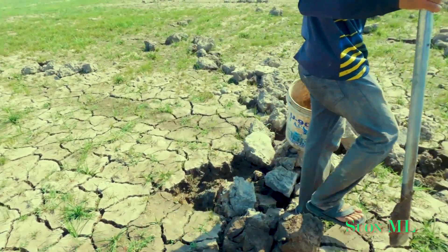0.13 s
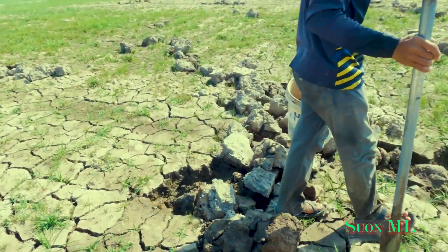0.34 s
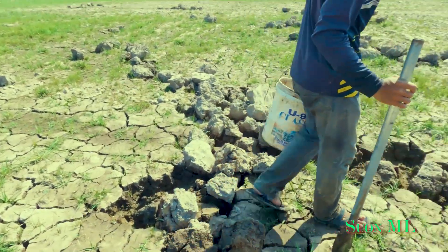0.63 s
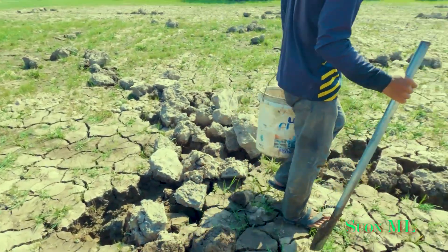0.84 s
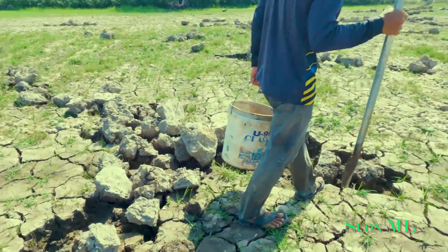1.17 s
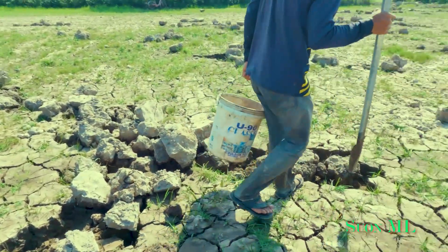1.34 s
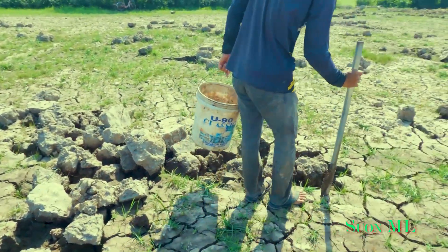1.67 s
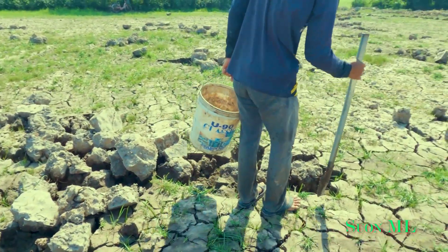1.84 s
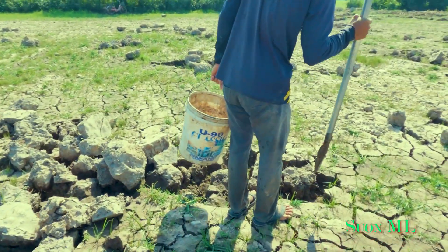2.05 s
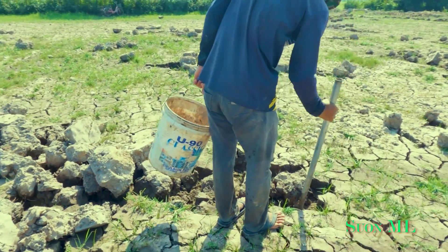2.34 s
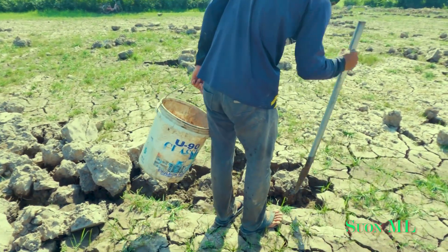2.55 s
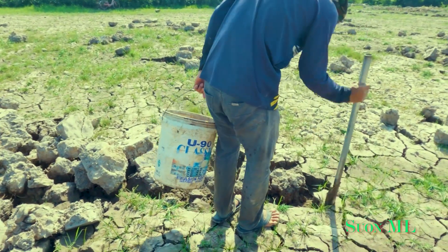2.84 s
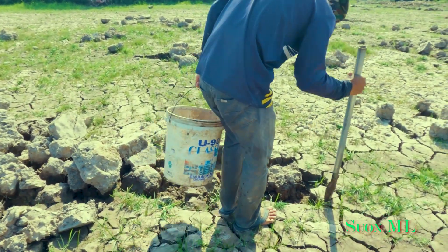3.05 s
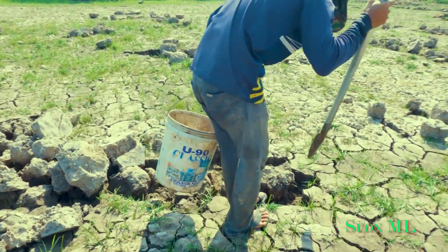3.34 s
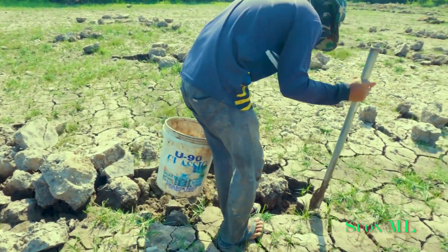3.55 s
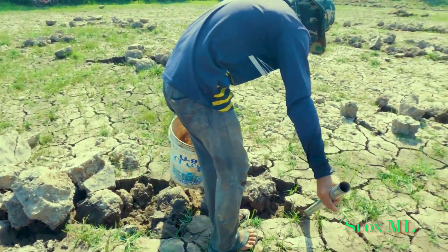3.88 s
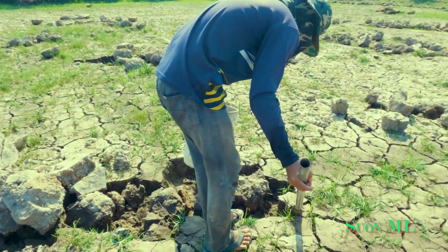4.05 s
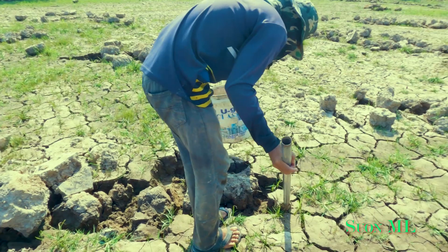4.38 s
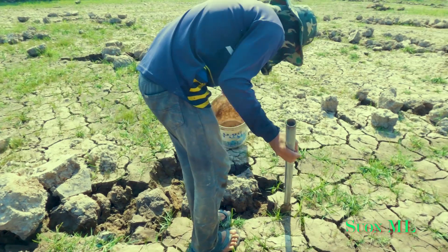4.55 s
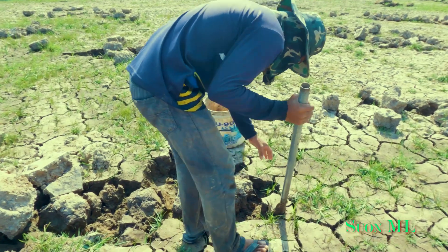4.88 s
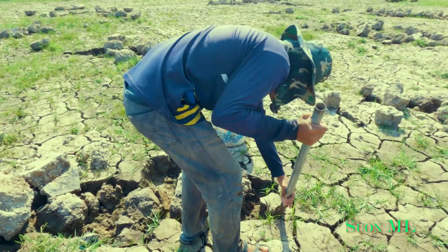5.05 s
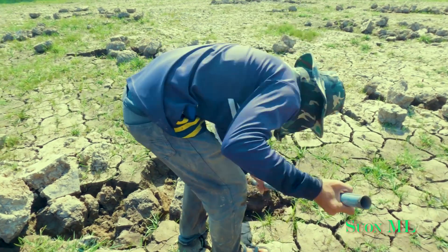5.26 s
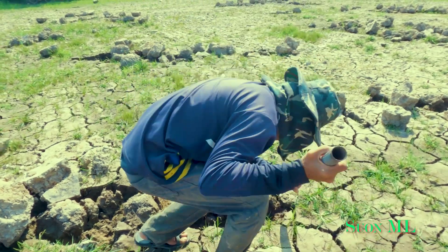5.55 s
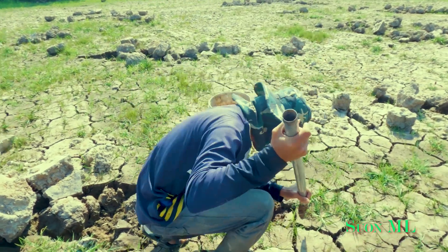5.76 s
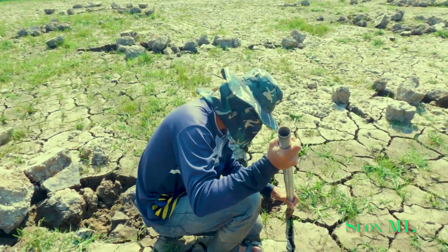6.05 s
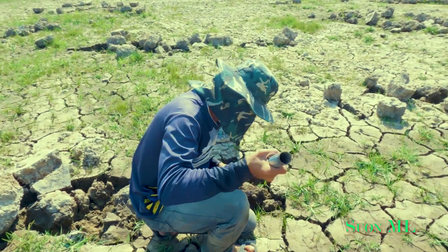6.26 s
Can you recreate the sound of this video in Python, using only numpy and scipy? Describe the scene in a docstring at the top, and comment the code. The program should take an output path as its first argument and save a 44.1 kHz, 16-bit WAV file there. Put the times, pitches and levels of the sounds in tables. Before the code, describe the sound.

A steel pipe stabs and crunches into dry clay, then a plastic bucket bumps down, over rustling and low wind rumble.

```python
"""An open field of dry cracked clay, a stereo microphone close to a man with a steel pipe and a bucket.
From the start gusts rumble on the microphone ports, feet and clothes rustle and crumbs snap.
From half a second in he stabs the pipe into the crust and pries: a crunch, a thud, a short ring.
Near 4.7 s the plastic bucket is set down with a hollow bump and its handle falls on the rim.
Two faint touches of the pipe follow after 6 s."""
import sys
import numpy as np
from scipy import signal
from scipy.io import wavfile

SR = 44100
rng = np.random.default_rng(int(sys.argv[2]) if len(sys.argv) > 2 else 0)


def materialize(psi):
    """Save the field psi as 16-bit PCM at rate SR to the path in sys.argv[1].

    A 1-D psi becomes a single channel; in a 2-D psi each row is a channel.
    """
    bounded = np.clip(np.atleast_2d(psi).T, -1, 1)
    quanta = np.round(bounded * 32767).astype(np.int16)
    wavfile.write(sys.argv[1], SR, quanta)


N = 283122
SCUFF_HZ, GRIT_HZ, CLOTH_HZ, TOP_HZ = 330, 1100, 5500, 16500   # edges of three noise regions


def from_db(db):
    """dB to gain."""
    return 10 ** (np.asarray(db) / 20)


def rms_one(x):
    """Scale to rms 1."""
    return x / np.sqrt(np.mean(x ** 2) + 1e-20)


def in_time(rows):
    """Each column of a timed table as a curve over every sample."""
    s, *columns = np.transpose(rows)
    return [np.interp(np.arange(N) / SR, s, c) for c in columns]


def at_hz(points, hz):
    """Read a table on a log-frequency axis."""
    frequencies, values = np.transpose(points)
    return np.interp(np.log(hz), np.log(frequencies), values)


def drift(rate_hz):
    """Slow random wander: low-passed noise at every 40th sample, rms 1."""
    r = np.exp(-80 * np.pi * rate_hz / SR)
    slow = signal.lfilter([1], [1, -2 * r, r * r], rng.standard_normal(N // 40 + 2002))[2000:]
    return np.interp(np.arange(N) / 40, np.arange(len(slow)), rms_one(slow))


def pan(db):
    """Left and right gains for a level difference."""
    return from_db([[db / 2], [-db / 2]])


def add(out, s, sound):
    """Mix a short sound in at s seconds."""
    i = round(s * SR)
    out[..., i:i + sound.shape[-1]] += sound[..., :N - i]


# How alike the two ports hear. Each row: frequency in Hz, likeness (1 is identical).
PORT_LIKENESS = [(25, 0.76), (60, 0.99), (150, 1), (380, 0.28), (950, 0.53), (2380, 0.84), (5980, 0.81),
                 (15000, 0.94)]

def bands(source, spectrum, low_hz, high_hz, patchy_db=0., patch_hz=10., shared_db=0.):
    """Mid and side noise to stereo in third-octave bands, each with its level, flicker and likeness."""
    out = 0
    edges = np.geomspace(low_hz, high_hz, round(3 * np.log2(high_hz / low_hz)) + 1)
    for k, (low, high) in enumerate(zip(edges, edges[1:])):
        band = signal.butter(2, [low, high], "band", fs=SR, output="sos")
        mid, side = signal.sosfilt(band, source[k % 2])
        hz = np.sqrt(low * high)
        alike = np.clip(at_hz(PORT_LIKENESS, hz), -1, 1)
        flicker_db = patchy_db * drift(patch_hz) + shared_db if patchy_db else 0
        gain = from_db(at_hz(spectrum, hz) + flicker_db)
        out = out + gain * (np.sqrt(1 + alike) * mid + np.sqrt(1 - alike) * side * [[1], [-1]])
    return out


# Wind right on the ports. Each row: time in seconds, deep gust in dB, upper rumble in dB,
# deep gust's left minus right in dB.
GUSTS = [(0.0, -41.5, -54, 7), (0.36, -48.5, -53.5, 3), (0.71, -45.5, -51, -3.5), (1.14, -46.5, -55.5, 0),
         (1.63, -54.5, -50.5, 2.5), (2.0, -36.5, -57, -7), (2.34, -52.5, -53.5, 11),
         (2.36, -47.5, -52.5, -10), (2.65, -49.5, -55, 0), (3.22, -53.5, -56, 3.5), (3.56, -51.5, -54.5, 0),
         (4.02, -57, -55.5, 0.5), (4.67, -50, -52, 0.0), (4.83, -52, -50.5, 2), (4.94, -50.5, -44, 1),
         (5.38, -49, -51.5, 1), (5.78, -50.5, -55.5, 0.5), (6.42, -58.5, -54, -3)]
# Colour of the rumble. Each row: frequency in Hz, relative level in dB.
GUST_SPECTRUM = [(11, -42), (18, -24.5), (38, -4.5), (65, -2), (156, -16), (188, -17), (238, -21),
                 (309, -36), (350, -34), (460, -64), (770, -120)]

def wind():
    """Lumpy low noise from eddies on the ports; an eddy lifts all bands together."""
    deep_db, upper_db, pan_db = in_time(GUSTS)
    white, eddies = rng.standard_normal((2, 2, N)), drift(32)
    deep = bands(white, GUST_SPECTRUM, 14, 107.1, patchy_db=5.5, patch_hz=2.6, shared_db=0.85 * eddies)
    upper = bands(white[::-1], GUST_SPECTRUM, 104.6, 324, patchy_db=2, patch_hz=4.7, shared_db=3 * eddies)
    sway = from_db([pan_db / 2, -pan_db / 2])
    return from_db(deep_db) * rms_one(deep) * sway + from_db(upper_db) * rms_one(upper)


def grainy(per_s, spread_db, grain_db):
    """Two mid and side pairs of smooth noise, with uneven grains breaking through in clumps."""
    born = rng.random((2, 1, N)) < per_s * from_db(6 * drift(15)) / SR
    sizes = from_db(spread_db * np.minimum(rng.exponential(1, N), 3))
    white = rng.standard_normal((2, 2, N))
    return white * (1 + from_db(grain_db) * born * sizes)


# The man moving over the clay. Each row: time in seconds, grit level in dB.
MOVEMENT = [(0.0, -64.5), (0.37, -68.5), (0.62, -60.5), (1.16, -60), (1.7, -54.5), (1.88, -61.5),
            (2.07, -66.5), (2.4, -64.5), (2.65, -59.5), (3.06, -55.5), (3.16, -61), (3.45, -65.5),
            (3.7, -62.5), (3.9, -60), (4.15, -57), (4.29, -63.5), (4.52, -64), (4.86, -59), (5.7, -63),
            (5.97, -64), (6.42, -54.5)]
# Colour of the rubbing. Each row: frequency in Hz, relative level in dB.
RUB_SPECTRUM = [(180, -32), (300, 7), (398, 2), (772, -3.5), (974, -6.5), (1060, -9.5), (1310, -3.5),
                (2090, -4), (2720, -5.5), (3670, -6.5), (6040, -13), (9140, -14), (14500, -30.5),
                (15800, -10)]

def rustle():
    """Feet, pipe and clothes rub: low scuff, grit and high cloth noise, all in short lumps."""
    grit_db, = in_time(MOVEMENT)
    swing_db = grit_db - grit_db.mean()
    scuff_db, cloth_db = -69.5 + 0.68 * swing_db, -70 + 0.88 * swing_db
    grains, lumps = grainy(per_s=500, spread_db=5, grain_db=5), drift(44)
    scuff = bands(grains, RUB_SPECTRUM, SCUFF_HZ, GRIT_HZ,
                  patchy_db=0.5, patch_hz=12, shared_db=3.6 * lumps)
    grit = bands(grains[::-1], RUB_SPECTRUM, GRIT_HZ, CLOTH_HZ,
                 patchy_db=3, patch_hz=12, shared_db=0.78 * lumps)
    cloth = bands(grains[..., ::-1], RUB_SPECTRUM, CLOTH_HZ, TOP_HZ,
                  patchy_db=0.04, patch_hz=14, shared_db=0.83 * lumps)
    air = signal.sosfilt(signal.butter(4, 10500, "high", fs=SR, output="sos"), cloth)
    cloth = cloth + 0.36 * np.tanh(swing_db / 10) * air   # the top comes and goes with the movement
    grit_rise_db, cloth_rise_db = swishes()
    return (from_db(scuff_db + .6 * grit_rise_db) * rms_one(scuff)
            + from_db(grit_db + grit_rise_db) * rms_one(grit)
            + from_db(cloth_db + cloth_rise_db) * rms_one(cloth))


def faint_crumbs(count, over_grit_db=7, middle_hz=2370):
    """Rows for small crumbs that snap at random moments, louder where there is more movement."""
    when, chance = rng.random(count) * N / SR, rng.standard_normal((count, 2))
    s, grit_db = np.transpose(MOVEMENT)
    level_db = over_grit_db + np.interp(when, s, grit_db) + 2.5 * chance[:, 0]
    return list(zip(when, level_db, middle_hz * np.exp(.6 * chance[:, 1])))


# The loudest crumbs of clay. Each row: start in seconds, level in dB, pitch in Hz.
LOUD_CRUMBS = [(0.361, -45.5, 2240), (0.481, -42, 7600), (0.584, -46, 2370), (0.783, -40, 1520),
               (0.811, -37, 3000), (0.843, -38, 1450), (1.204, -44.5, 1490), (1.254, -39.5, 2170),
               (1.687, -40, 2200), (1.713, -31, 4500), (2.494, -34.5, 1870), (2.509, -38.5, 1520),
               (3.034, -41, 2280), (3.365, -42, 1320), (3.536, -41.5, 1700), (3.794, -45.5, 3770),
               (4.147, -37.5, 2430), (4.289, -40.5, 1780), (4.33, -37.5, 2470), (4.449, -45, 1330),
               (4.494, -38.5, 1460), (4.636, -44.5, 990), (5.157, -38.5, 1210), (5.269, -45, 1570),
               (5.37, -46, 3700), (5.412, -42, 2150), (5.55, -42, 895), (5.575, -35.5, 1470),
               (5.713, -45.5, 2200), (5.788, -48, 1980), (6.101, -42, 1640), (6.274, -40, 3750),
               (6.344, -46.5, 2650)]

def snaps(ring_cycles=12.5, clicks_per_s=5000, spray_t60=0.031, scatter_db=3):
    """A crumb breaks with a click, rings a few cycles and crumbles in a spray of tiny uneven clicks."""
    out, t = np.zeros((2, N)), np.arange(SR // 12) / SR
    for s, level_db, hz in LOUD_CRUMBS + faint_crumbs(count=70):
        tone = np.sin(2 * np.pi * hz * t) * from_db(-0.5 - 60 * t * hz / ring_cycles)
        band = signal.butter(3, [hz / 2, min(2 * hz, TOP_HZ)], "band", fs=SR, output="sos")
        clicks = rng.standard_normal(len(t)) * (rng.random(len(t)) < clicks_per_s / SR)
        clicks[0] = 2.5   # the first break is the sharpest
        spray = signal.sosfilt(band, clicks) * from_db(5 - 60 * t / spray_t60)
        add(out, s, from_db(level_db) * (tone + spray) * pan(scatter_db * rng.standard_normal()))
    return out


# Cloth and grass brushing. Each row: middle and length in seconds, grit rise and cloth rise in dB.
BRUSHES = [(0.489, 0.074, 6.5, 17), (0.713, 0.049, 3.5, 12), (0.826, 0.32, 4, 2), (1.11, 0.15, 5.5, 8),
           (1.296, 0.093, 6.5, 7), (1.44, 0.062, 4, 10), (1.7, 0.072, 9, 9.5), (1.813, 0.32, 6.5, 6.5),
           (3.18, 0.19, 7.5, 11), (3.444, 0.22, 10, 7.5), (3.966, 0.095, 6.5, 4), (4.082, 0.1, 1, 1.5),
           (4.667, 0.16, 10, 6.5), (4.765, 0.09, 4.5, 6), (5.381, 0.067, 8.5, 14.5),
           (5.578, 0.048, 14.5, 11.5), (6.076, 0.14, 8.5, 12.5), (6.291, 0.066, 6.5, 11),
           (6.383, 0.14, 7.5, 4.5)]

def swishes(lean=0.88):
    """Each swish lifts grit and cloth by a smooth hump in dB, rising faster than it fades."""
    rise_db = np.zeros((2, N))
    for middle_s, length_s, grit_db, cloth_db in BRUSHES:
        through = np.linspace(0, 1, round(length_s * SR))
        hump = np.sin(np.pi * through ** lean) ** 2
        add(rise_db, middle_s - length_s / 2, np.outer([grit_db, cloth_db], hump))
    return rise_db


def modes(table, contact_s, spread_db=0., rattle_s=0.):
    """One soft contact sets each mode ringing; a rattling contact keeps exciting it for a while."""
    t = np.arange(SR // 2) / SR
    hz, level_db, t60 = np.transpose(table)[:, :, None]
    gains = from_db(level_db + spread_db * rng.standard_normal(hz.shape) - 60 * t / t60)
    rings = gains * np.sin(2 * np.pi * hz * t) * (1 - np.exp(-t / contact_s))
    if rattle_s:
        touching = rng.random(SR // 8) < .015   # separate little knocks
        touching[:20] = True
        fade = np.exp(-t[:SR // 8] / rattle_s)
        jolts = 3.77 * touching * rng.standard_normal((len(table), SR // 8)) * fade
        rings = signal.fftconvolve(rings, jolts / np.sqrt(rattle_s * SR / 2), axes=1)
    return rings.sum(axis=0)


# Pipe meets clay, near the microphone. Each row: start in seconds, crunch level in dB, crunch t60
# in seconds, then thud, crust, tube, tip, bending and blade levels in dB.
STABS = [(0.530, -19, 0.057, -24.5, -38, -25.5, -23, -50, -46),
         (1.0981, -33, 0.056, -53, -45.5, -55, -35.5, -79, -85),
         (1.6193, -23.5, 0.027, -30, -38.5, -40.5, -57, -70, -69),
         (1.7368, -37, 0.05, -55, -37.5, -67, -48, -72, -65),
         (2.4575, -33.5, 0.074, -37.5, -35.5, -46, -48.5, -41.5, -53),
         (2.9636, -20, 0.051, -29.5, -32.5, -25, -46, -50.5, -59),
         (3.192, -43, 0.035, -44, -61, -45, -61, -50.5, -68),
         (3.6897, -18.5, 0.077, -35.5, -33.5, -24, -41, -50.5, -35),
         (6.053, -50, 0.039, -58, -78, -49, -62, -79, -64),
         (6.284, -45, 0.044, -46, -67, -67, -49.5, -80, -53)]
# Modes of the ground, its crust and the steel. Each row: pitch in Hz, level in dB, t60 in seconds.
THUD_MODES = [(73.6, 5, 0.11), (141, 0, 0.057)]
CRUST_MODES = [(283, 5.5, 0.032), (357, 11, 0.017), (406, -17, 0.044)]
BENDING_MODES = [(251.3, -1.5, 0.56), (455, -8.5, 0.21), (623, -7.5, 0.28)]
BLADE_MODES = [(972, 0, 0.14)]
PIPE_SHELL_MODES = [(1375, 0, 0.032)]
TUBE_MODES = [(1650, 11, 0.011), (1828, 4.5, 0.026), (2212, 3, 0.022)]
TIP_MODES = [(2610, 4, 0.015), (3055, 6.5, 0.016), (3610, 4.5, 0.014), (4105, -6.5, 0.023)]

def pipe(thud_late_s=0.0056, spread_db=2.5):
    """Each stab knocks the crust, rings the hand-damped tube and thuds once the tip has bitten."""
    out = np.zeros(N)
    for s, _, _, thud_db, crust_db, tube_db, tip_db, bend_db, blade_db in STABS:
        add(out, s + thud_late_s, from_db(thud_db) * modes(THUD_MODES, contact_s=0.0067))
        crust = from_db(crust_db) * modes(CRUST_MODES, 0.0017)
        bend = from_db(bend_db) * modes(BENDING_MODES, 0.0011)
        blade = from_db(blade_db) * modes(BLADE_MODES, 0.00025)
        shell = from_db(tube_db + 2.5) * modes(PIPE_SHELL_MODES, 0.00039)
        tube = from_db(tube_db) * modes(TUBE_MODES, 0.002, spread_db)
        tip = from_db(tip_db) * modes(TIP_MODES, 0.00058, spread_db)
        add(out, s, crust + bend + blade + shell + tube + tip)
    return out * pan(db=-1)


def burst(t60, rise_s):
    """Envelope of a crunch: quick rise, exponential fall."""
    t = np.arange(SR // 5) / SR
    return from_db(-60 * t / max(t60, .005)) * (1 - np.exp(-t / rise_s))


def crunch(contacts, spectrum, treble_db, rise_s, crest_db=9, dulling_db_per_s=117):
    """Noise at the start of every contact; a longer, softer crunch has less treble."""
    body, treble = np.zeros((2, N))
    for s, level_db, t60, *_ in contacts:
        add(body, s, from_db(level_db - crest_db) * burst(t60, rise_s))
        add(treble, s, from_db(level_db + treble_db - dulling_db_per_s * t60) * burst(0.95 * t60, rise_s))
    white = rng.standard_normal((2, 2, N)) * from_db([[0], [-6]])   # one close source: little side
    out = 0
    for envelope, low, high in ((body, SCUFF_HZ, CLOTH_HZ), (treble, CLOTH_HZ, TOP_HZ)):
        steady_rms = np.std(bands(white[..., :SR // 2], spectrum, low, high))
        out = out + bands(white * envelope + 1e-18, spectrum, low, high) / steady_rms
        white = white[::-1]
    return out


# Colour of breaking clay, heard close. Each row: frequency in Hz, relative level in dB.
CLAY_SPECTRUM = [(180, -35), (300, -3.5), (1090, -10), (1380, -9), (3160, -13.5), (3990, -9.5), (4790, -18),
                 (9140, -17), (11500, -26), (16500, -46)]

def clay_crunch():
    """The dry crust is crushed under the pipe at each stab."""
    return crunch(STABS, CLAY_SPECTRUM, treble_db=-11, rise_s=0.0008)


# The bucket lands nearby and its handle falls. Each row: start in seconds, crunch level in dB,
# crunch t60 in seconds, then bottom, wall and rim levels in dB.
BUCKET_KNOCKS = [(4.668, -23, 0.046, -22.5, -26, -18.5), (4.6738, -15.5, 0.1, -9, -7.5, -19),
                 (4.6934, -26.5, 0.067, -24, -16.5, -19), (4.891, -28, 0.032, -54, -47, -31),
                 (4.9249, -5.5, 0.045, -58, -25, -19), (4.9406, -17, 0.068, -33.5, -23.5, -20),
                 (4.978, -37, 0.063, -52, -52, -50), (5.057, -24, 0.08, -28.5, -28, -25.5),
                 (5.1111, -33.5, 0.055, -55, -65, -39), (5.136, -44, 0.029, -34, -45.5, -43),
                 (5.178, -44, .04, -37, -48.5, -50), (5.468, -62, 0.035, -41.5, -36, -56)]
# Modes of the bucket. Each row: pitch in Hz, level in dB, t60 in seconds.
BOTTOM_MODES = [(154, 0.013, 0.27)]
WALL_MODES = [(232.5, -9, 0.31), (280.6, 5.5, 0.15), (309.4, -16.5, 0.23), (474, -12.5, 0.07)]
RIM_MODES = [(937, -11, .045), (1003, -10, .045), (1060, -12, .04), (1117, -12, .04), (1180, -10, .035),
             (1500, -16, .04), (1680, -15, .03), (2800, -20, .015)]

def bucket(settled_s=4.78, least_free_s=0.044):
    """The hollow shell drums and the rim rattles; resting on the ground mutes bottom and wall."""
    out, t = np.zeros(N), np.arange(SR // 2) / SR
    for s, _, _, bottom_db, wall_db, rim_db in BUCKET_KNOCKS:
        free_s = max(settled_s - s, least_free_s)
        muting = from_db(-12 * np.clip((t - free_s) / .02 + .5, 0, 1))
        bottom = from_db(bottom_db) * modes(BOTTOM_MODES, contact_s=0.0014)
        wall = from_db(wall_db) * modes(WALL_MODES, 0.0035)
        add(out, s, (bottom + wall) * muting)
        add(out, s, from_db(rim_db) * modes(RIM_MODES, 0.00018, spread_db=6.5, rattle_s=0.027))
    return out


# Colour of knocked plastic, heard close. Each row: frequency in Hz, relative level in dB.
PLASTIC_SPECTRUM = [(180, -35), (300, -9), (711, -26), (1170, -0.5), (1710, -7.5), (1860, -8.5), (2860, -8),
                    (5290, -25), (8550, -28), (15800, -47.5)]

def plastic_crunch():
    """Each knock on the bucket opens with a short burst of noise."""
    return crunch(BUCKET_KNOCKS, PLASTIC_SPECTRUM, treble_db=-18, rise_s=0.00064)


def scene():
    """All sources in the open air of the field."""
    crunches = clay_crunch() + plastic_crunch()
    return rustle() + wind() + pipe() + bucket() + crunches + snaps()


def record(dry):
    """The stereo microphone: below the treble the left port hears a little later; the top is cut."""
    lag_edge_hz, cutoff_hz = 6500, 16100
    slope = np.diff(dry[0], prepend=0)
    left = dry[0] - 1.84 * signal.sosfiltfilt(signal.butter(2, lag_edge_hz, fs=SR, output="sos"), slope)
    return signal.sosfilt(signal.cheby2(14, 70, cutoff_hz, fs=SR, output="sos"), [left, dry[1]])


dry = scene()
out = record(dry)
materialize(out)
```